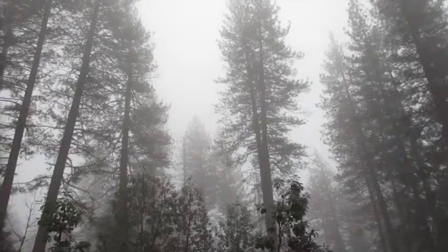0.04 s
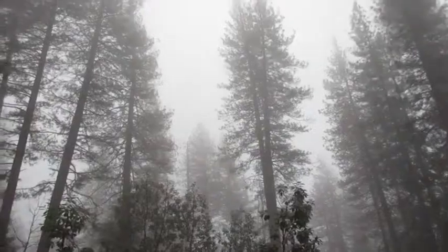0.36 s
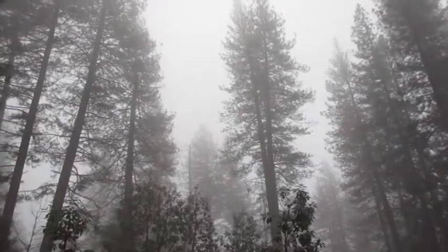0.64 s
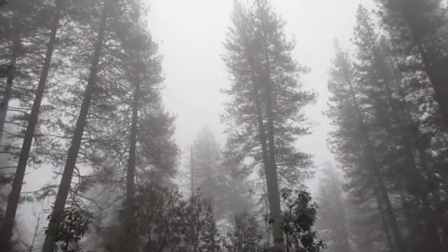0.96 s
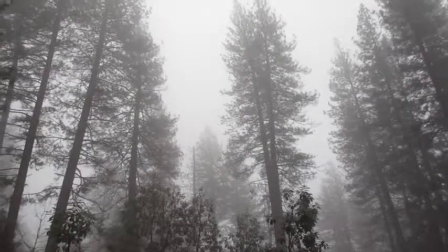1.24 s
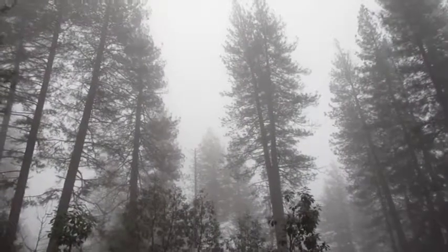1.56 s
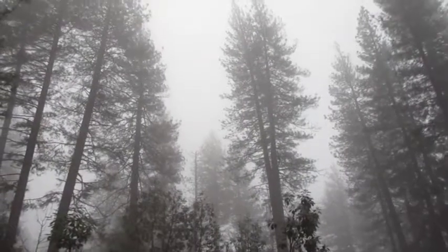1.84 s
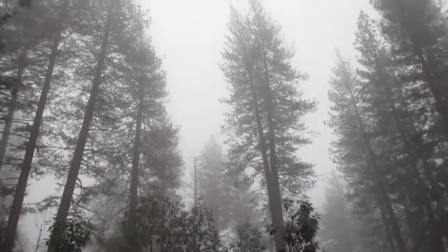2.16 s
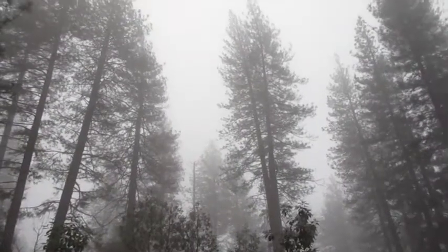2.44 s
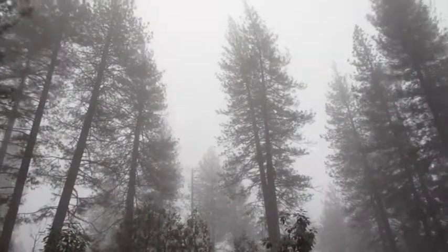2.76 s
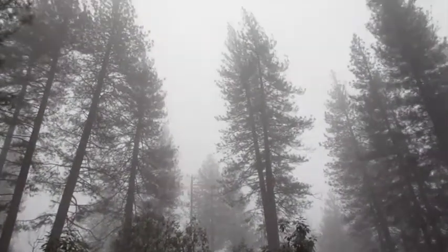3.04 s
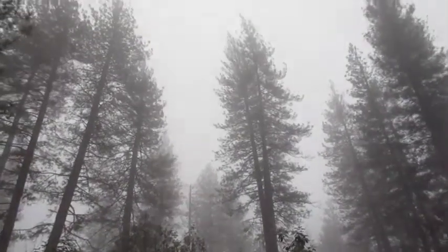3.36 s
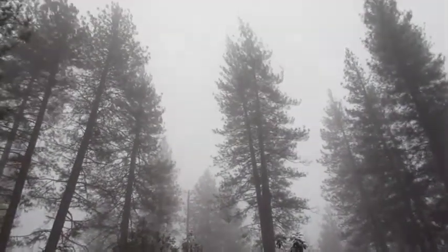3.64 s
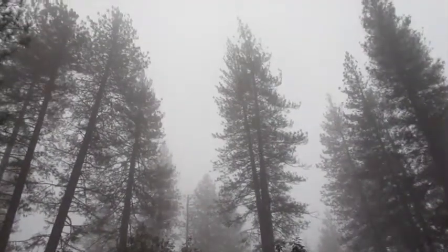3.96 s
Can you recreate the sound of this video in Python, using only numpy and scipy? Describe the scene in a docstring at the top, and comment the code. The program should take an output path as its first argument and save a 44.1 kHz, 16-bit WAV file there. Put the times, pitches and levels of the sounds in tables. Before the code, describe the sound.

Wind rushing through tall conifers cuts in at about 0.3 seconds, swells slightly until 1.5 seconds, then holds steady to the end at 4 seconds. Fine droplets patter very faintly. From about 0.9 seconds, scattered water drops tick close by, the sharpest near 3.4 seconds. Air rumbles on the microphone, with short low thumps from about 1 second on, hardest near 2.4 seconds.

```python
"""After a short silence, wind cuts in, rushing through tall, foggy conifers: turbulence roars in the
crowns and hisses in the needles. Air rumbles on the single microphone and fine droplets patter faintly.
The wind swells a little over the first second or so, then holds steady. From about one second on,
water drops tick as they strike things close by, and eddies thump on the microphone, hardest near 2.4 s."""
import sys
import numpy as np
from scipy import signal
from scipy.fft import rfft, irfft, next_fast_len
from scipy.io import wavfile
from scipy.ndimage import uniform_filter1d, map_coordinates

SR = 44100
rng = np.random.default_rng(int(sys.argv[2]) if len(sys.argv) > 2 else 0)


def store_wav(level_fs):
    """Save 16-bit WAV to argv[1]."""
    pcm = np.round(np.clip(np.atleast_2d(level_fs), -1, 1) * 32767)
    wavfile.write(sys.argv[1], SR, pcm.T.astype(np.int16))


N = 176400
T = np.arange(N) / SR


def amp(db):
    """Decibels to amplitude ratio."""
    return 10 ** (np.asarray(db) / 20)


def unit_rms(x):
    """Normalisation to an rms of 1."""
    return x / np.sqrt(np.mean(x ** 2) + 1e-20)


def gain_at(spectrum, hz):
    """Amplitude response, interpolated in decibels over log frequency."""
    points_hz, points_db = np.transpose(spectrum)
    return amp(np.interp(np.log(hz + 1), np.log(points_hz + 1), points_db))


def envelope(rows):
    """Linear interpolation in time, one value per sample."""
    return np.interp(T, *np.transpose(rows))


def wobble(knots_per_s):
    """Smooth random modulation: a spline through Gaussian values."""
    return map_coordinates(rng.standard_normal(400), [T * knots_per_s], mode="mirror")


def filtered(x, response):
    """Linear filtering: the spectrum of x times a frequency response."""
    size = next_fast_len(2 * len(x))
    return irfft(rfft(x, size) * response(np.fft.rfftfreq(size, 1 / SR)), size)[:len(x)]


def add(out, start_s, sound):
    """Superposition of a short sound on the mix."""
    part = out[max(0, round(start_s * SR)):][:len(sound)]
    part += sound[:len(part)]


def turbulence(spectrum, patchy_db):
    """Modulated noise of rms 1: its gain varies in random patches of time and frequency."""
    cells = signal.stft(rng.standard_normal(N), nperseg=512)[2]
    patches = uniform_filter1d(rng.standard_normal(cells.shape), size=7, axis=0)
    patches = uniform_filter1d(patches, size=18, axis=1)
    noise = signal.istft(cells * amp(patchy_db * unit_rms(patches)), nperseg=512)[1][:N]
    return unit_rms(filtered(noise, lambda hz: gain_at(spectrum, hz)))


# Strength of the wind's sound: time_s, level_db
WIND_LEVEL = [(.29, -29), (.6, -28), (.95, -27), (1.3, -25.5), (1.7, -25), (2.2, -25.5), (2.7, -25.5),
              (3.2, -25.5), (3.6, -25.5), (4, -25.5)]
# Spectra of the crowns' rush and the needles' hiss: frequency_hz, relative_density_db
CROWN_SPECTRUM = [(25, -14.5), (70, -7), (125, 1.5), (190, -5), (290, -4), (370, -5), (550, -3.5),
                  (760, -5), (980, -3), (1250, -8.5), (1800, -12), (2550, -15), (4000, -22.5),
                  (6000, -29.5), (9000, -44), (15500, -71)]
NEEDLE_SPECTRUM = [(800, -21), (3000, 5), (5000, 0.5), (8300, -2.5), (10000, -8.5), (11300, -13.5),
                   (13000, -14.5), (15500, -21)]
NEEDLE_DB, NEEDLE_DB_PER_GUST_DB = -23, 0.71  # relative to the crowns; the hiss swells less than the rush


def wind_in_trees():
    """Aerodynamic noise: one wind strength drives the rush of the crowns and the hiss of the needles."""
    wind_db = envelope(WIND_LEVEL)
    gust_db = wind_db - wind_db.mean() + .2 * wobble(7.27)
    crowns = amp(gust_db) * turbulence(CROWN_SPECTRUM, patchy_db=0.32)
    hiss = unit_rms(filtered(rng.standard_normal(N), lambda hz: gain_at(NEEDLE_SPECTRUM, hz)))
    needles = amp(NEEDLE_DB + NEEDLE_DB_PER_GUST_DB * gust_db + 1.4 * wobble(45)) * hiss
    return amp(wind_db.mean()) * (crowns + needles)


# Airflow on the microphone: time_s, level_db
RUMBLE_LEVEL = [(.3, -47), (.9, -41), (1.15, -34.5), (2.1, -40), (2.7, -38), (3.3, -33), (4, -38)]
# Spectrum of its rumble: frequency_hz, relative_density_db
RUMBLE_SPECTRUM = [(12, -19), (30, -1.5), (60, 1), (110, 1), (200, -10), (400, -34), (1000, -68)]
# Single eddies: centre_s, envelope_peak_db, pitch_hz, half_width_s
EDDIES = [(1.098, -18.5, 70, 0.0057), (1.112, -23, 170, 0.0048), (1.462, -29, 55, 0.0075),
          (2.3665, -7, 88, 0.0091), (2.359, -12.5, 196, 0.003), (2.392, -20, 129, 0.0083),
          (2.414, -13, 147, 0.0052), (2.424, -14, 220, 0.0047), (2.592, -13, 89, 0.0045),
          (2.697, -18, 100, 0.0026), (2.758, -13, 142, 0.0028), (2.785, -13.5, 105, 0.0029),
          (2.82, -18, 110, 0.0042), (2.869, -20.5, 84, 0.0065), (3.244, -21, 50, .011),
          (3.395, -24.5, 75, 0.0072), (3.632, -17.5, 62, 0.0098), (3.711, -21.5, 52.4, 0.0077)]


def buffeting():
    """Turbulent pressure on the microphone: a lumpy rumble, and eddies that swing it once or twice."""
    rumble = amp(2.5 * wobble(14)) * turbulence(RUMBLE_SPECTRUM, patchy_db=-2.7)
    out = amp(envelope(RUMBLE_LEVEL)) * unit_rms(rumble)
    for centre_s, peak_db, pitch_hz, half_width_s in EDDIES:
        t = T - centre_s
        pulse = amp(peak_db) * np.exp(-(t / half_width_s) ** 2)
        out += pulse * np.sin(2 * np.pi * (pitch_hz * t + rng.random()))
    return out


# Response of the surfaces that all drops strike, far and near: frequency_hz, gain_db
SURFACE_RESPONSE = [(500, -29), (1600, -3.5), (2900, 0), (4000, -8.5), (4700, -5), (6200, -9), (7050, -14),
                    (7600, -5), (8500, -9), (9400, -13), (11200, -13), (12200, -15), (15500, -23)]
# Fine droplets that stand out from the patter: start_s, level_db, centre_hz
CLEAR_DROPLETS = [(.627, -44, 8800), (.924, -42, 11000), (1.196, -46, 11500), (1.79, -43, 10500),
                  (2.62, -46, 13000), (2.685, -38.5, 11300), (2.882, -41, 12000)]
PATTER_PER_S, PATTER_BASE_DB, PATTER_SPREAD_DB, PATTER_T60_S = 60, -53.5, 2.5, .025
PATTER_HZ, PATTER_LOG_WIDTH = 8600, 0.24
PATTER_DB_PER_GUST_DB = 1.5  # more wind shakes down bigger drops


def far_patter():
    """Shot noise: droplets land, most at random times, each a decaying burst in its own treble band."""
    out, t = np.zeros(N), T[:1024]
    wind_db = envelope(WIND_LEVEL)
    ticks = list(CLEAR_DROPLETS)
    for _ in range(round(PATTER_PER_S * N / SR)):
        start_s = rng.uniform(0, N / SR)
        size = min(rng.exponential(), 2.5)
        gust_db = np.interp(start_s, T, wind_db) - wind_db.mean()
        level_db = PATTER_BASE_DB + PATTER_SPREAD_DB * size + PATTER_DB_PER_GUST_DB * gust_db
        ticks.append((start_s, level_db, PATTER_HZ * np.exp(.2 * rng.normal())))
    for start_s, level_db, centre_hz in ticks:
        band = lambda hz: np.exp(-(np.log((hz + 1) / centre_hz) / PATTER_LOG_WIDTH) ** 2 / 2)
        noise = filtered(rng.standard_normal(len(t)), lambda hz: band(hz) * gain_at(SURFACE_RESPONSE, hz))
        add(out, start_s, amp(level_db - 60 * t / PATTER_T60_S) * unit_rms(noise))
    return out


# Drops landing close by: start_s, level_db, knock_hz, cutoff_hz
NEAR_DROPS = [(0.8851, -19, 2870, 8300), (1.595, -29, 7040, 11000), (1.8928, -20, 4540, 8400),
              (2.3635, -25, 3420, 5500), (2.457, -28, 4000, 5000), (2.745, -32, 5550, 7000),
              (3.1996, -21, 3660, 7000), (3.444, -13.5, 3050, 12500), (3.693, -25.5, 7740, 14000),
              (3.813, -24.5, 4550, 6040), (3.914, -30, 7300, 8500), (3.958, -32, 6500, 8000)]
DROP_ATTACK_S, DROP_HOLD_S, DROP_T60_S = .0002, .0013, .0045
KNOCK_DB = -4.5  # relative to the splash


def near_drops():
    """Impact excitation: each drop makes a low-passed splash and a damped ring of the struck spot."""
    out, t = np.zeros(N), T[:512]
    attack = 1 - np.exp(-t / DROP_ATTACK_S)
    shape = attack * amp(-60 * np.maximum(t - DROP_HOLD_S, 0) / DROP_T60_S)
    shape_rms = np.sqrt(np.mean(shape ** 2))
    for start_s, level_db, knock_hz, cutoff_hz in NEAR_DROPS:
        colour = lambda hz: gain_at(SURFACE_RESPONSE, hz) / np.sqrt(1 + (hz / cutoff_hz) ** 10)
        splash = unit_rms(shape * filtered(rng.standard_normal(len(t)), colour))
        knock = unit_rms(shape * np.sin(2 * np.pi * knock_hz * t))
        add(out, start_s, amp(level_db) * shape_rms * unit_rms(splash + amp(KNOCK_DB) * knock))
    return out


def scene():
    """Superposition: the pressures of wind and dripping water add in one channel."""
    return (wind_in_trees() + buffeting() + far_patter() + near_drops())[None]


ONSET_S, BAND_LIMIT_HZ = .287, 15850


def record(dry):
    """Gating and band limiting: the sound cuts in after a silence and passes an ideal low-pass filter."""
    gated = dry[0] * (T >= ONSET_S)
    return filtered(gated, lambda hz: hz < BAND_LIMIT_HZ)[None]


dry = scene()
out = record(dry)
store_wav(out)
```